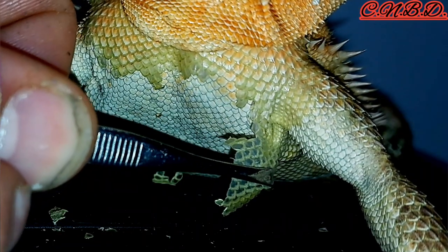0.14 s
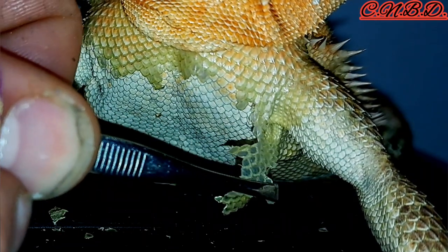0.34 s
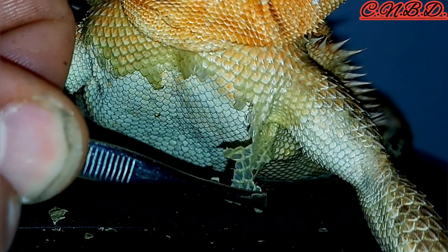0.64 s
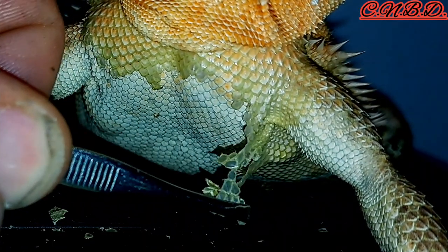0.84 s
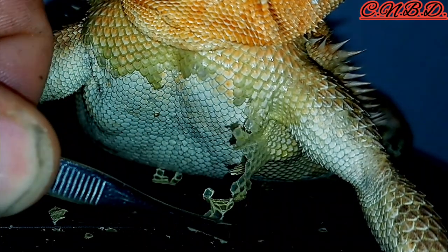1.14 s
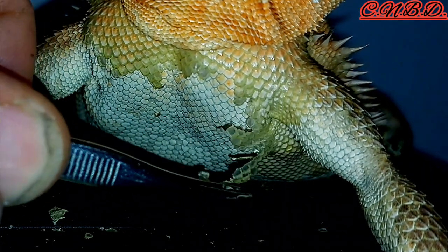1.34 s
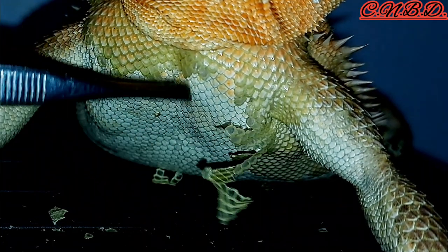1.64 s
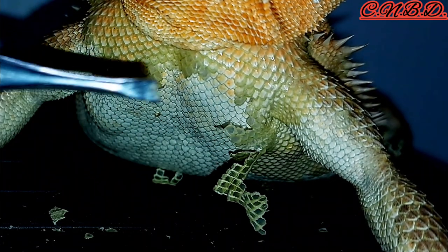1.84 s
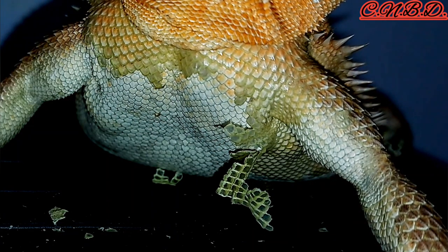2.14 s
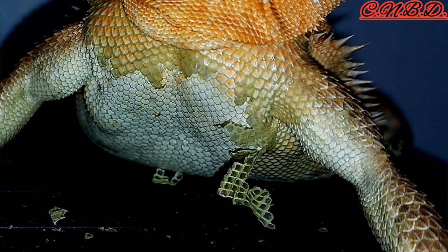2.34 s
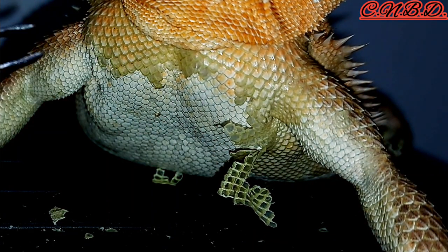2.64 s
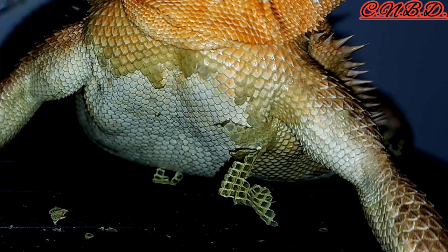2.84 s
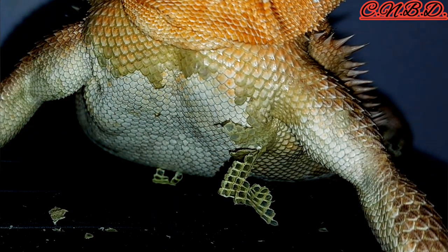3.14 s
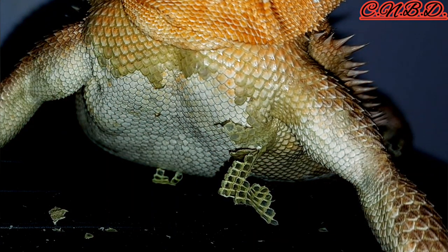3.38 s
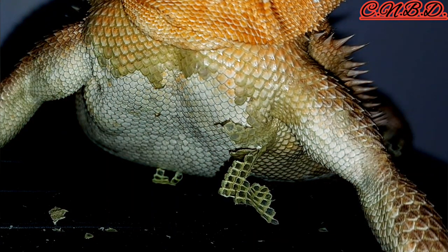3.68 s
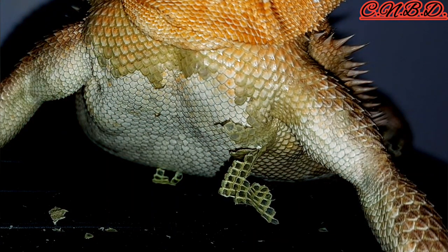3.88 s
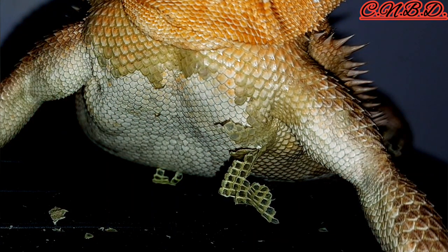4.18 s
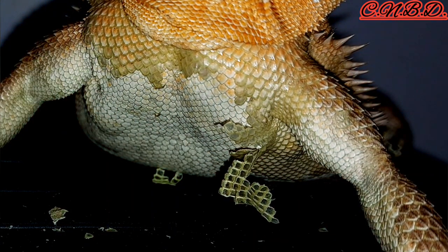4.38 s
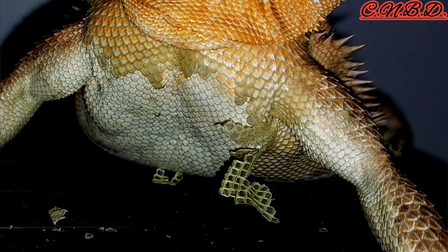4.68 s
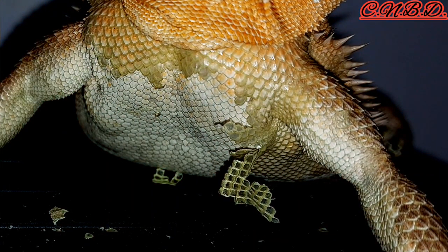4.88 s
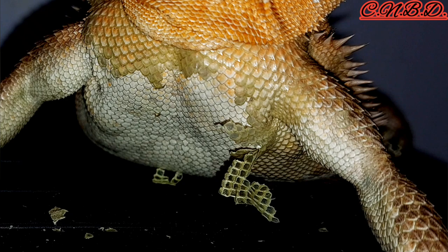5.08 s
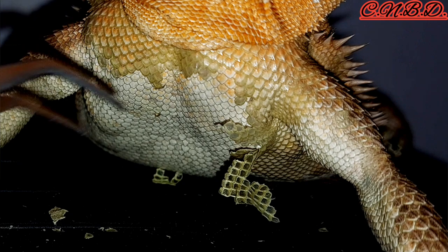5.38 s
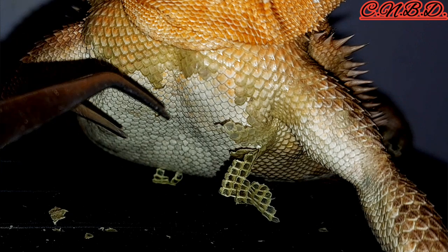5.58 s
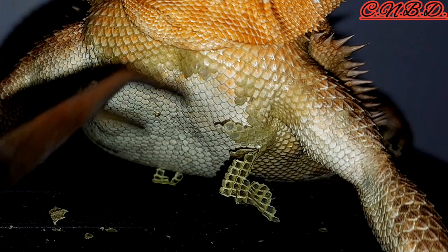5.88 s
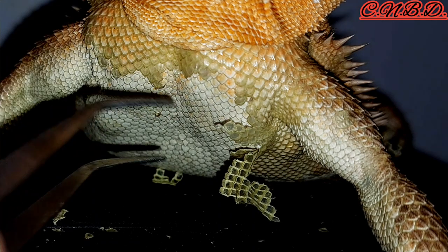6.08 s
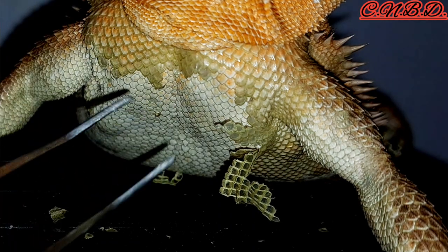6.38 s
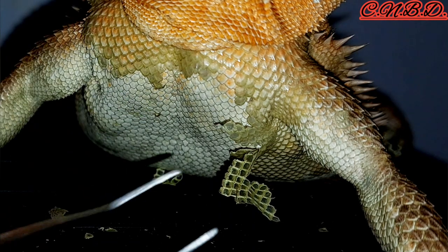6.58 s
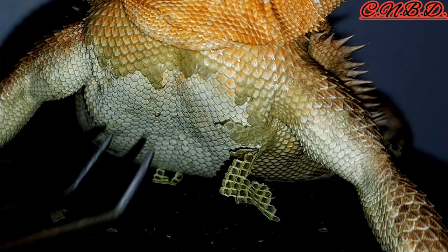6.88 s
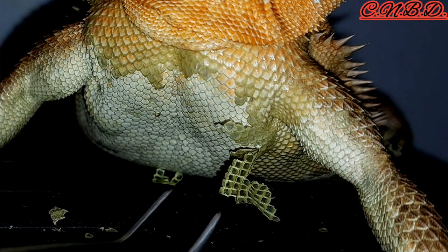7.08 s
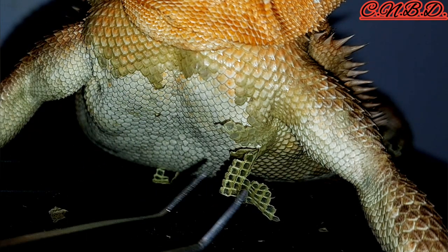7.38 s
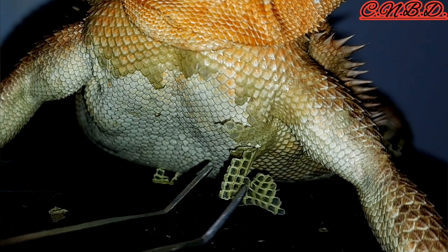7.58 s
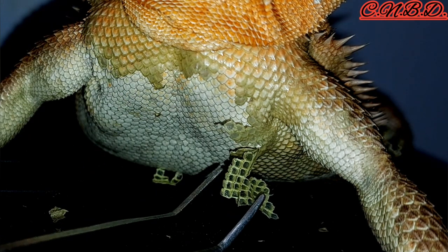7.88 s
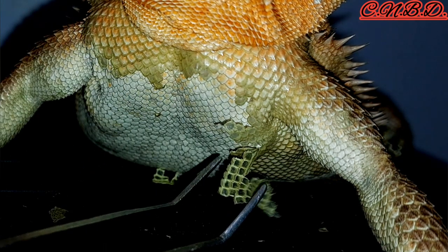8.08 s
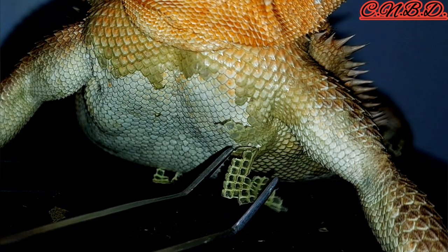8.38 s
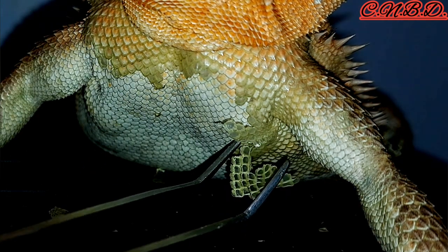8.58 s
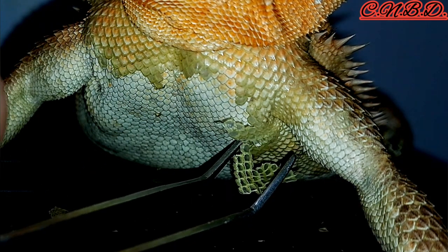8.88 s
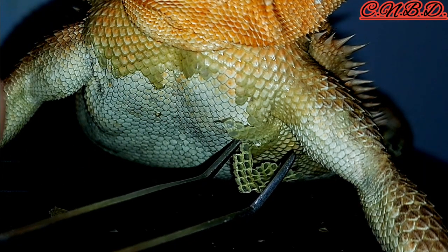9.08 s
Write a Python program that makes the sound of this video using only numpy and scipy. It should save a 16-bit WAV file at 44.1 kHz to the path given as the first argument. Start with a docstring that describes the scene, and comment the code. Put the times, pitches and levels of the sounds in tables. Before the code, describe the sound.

Close, quiet handling of tweezers: tiny snaps of peeling skin, sleeve rustle, low rumble, then sharp knocks on a table and a few fine metallic clicks.

```python
"""Tweezers used, laid down and swapped on a table top, close to two microphones in a quiet room.
Throughout: faint hiss, rumble, humming low table modes, a thin whine, small movements.
0-1 s: dry skin crackles and ticks (noise snaps). 1-5 s: hands and sleeves rustle (grainy noise),
tips scrape skin (resonant noise), light knocks (ringing modes), tools slide (jolting noise).
From 5.8 s: knocks, hardest at 6.1-7.1 s, steel strokes (ringing friction noise); then ticks, rustle."""
import sys
import numpy as np
from scipy import signal
from scipy.fft import rfft, irfft
from scipy.io import wavfile
from scipy.ndimage import uniform_filter1d

SR = 44100
rng = np.random.default_rng(int(sys.argv[2]) if len(sys.argv) > 2 else 0)


def log_audio(samples):
    """Write samples as a 16-bit WAV file to the path given in sys.argv[1]."""
    # one column per channel
    frames = np.atleast_2d(samples).T
    # limit to full scale, then quantise
    limited = np.clip(frames, -1, 1)
    pcm = np.round(limited * 32767).astype(np.int16)
    wavfile.write(sys.argv[1], SR, pcm)


N = 407043  # samples

# Spectra below set relative level only: (frequency [Hz], density [dB per Hz]).
# room tone and microphone noise spectrum: (frequency [Hz], density [dB per Hz])
HISS_SPECTRUM = [(12, -57.5), (20, -10.5), (49, -13), (91, -19), (142, 6), (163, -10), (204, -9.5),
                 (328, -18.5), (388, -25.5), (558, -27.5), (2140, -35.5), (5850, -44.5), (9400, -40),
                 (12400, -38.5), (16000, -40)]
HISS_DB = -62
# left-right correlation of the hiss: (frequency [Hz], correlation [-1..1])
HISS_CORRELATION = [(60, 1), (180, 0.8), (550, 0.27), (1650, -0.2), (4970, -0.55), (15000, -0.51)]
# room decay: (frequency [Hz], t60 [s])
ROOM_DECAY = [(150, 0.47), (400, 0.24), (1000, 0.24), (2800, 0.2), (7500, 0.14)]
EDGE_HZ = 15900
LAG_S = 0.00019  # low sounds reach the left microphone first

# table under arms and house rumble: (time [s], hum [dB], deep sway [dB], creak [dB])
SHAKE_LEVELS = [(0.0, -89, -67, -98), (0.38, -52, -52.5, -73), (0.6, -66.5, -62, -76),
                (1.2, -62.5, -56, -76), (1.45, -79, -62.5, -77.5), (1.9, -65, -59.5, -73),
                (2.11, -41.5, -44.5, -62), (2.41, -64, -61.5, -71.5), (2.57, -53.5, -56, -67.5),
                (2.88, -67.5, -64, -72.5), (3.05, -55, -61, -71), (3.6, -66, -74, -73.5),
                (3.8, -55.5, -60.5, -59), (4.32, -52, -56, -61.5), (4.55, -49, -59, -68.5),
                (5.2, -61, -64.5, -75.5), (5.58, -73, -85, -86.5), (5.78, -56.5, -69, -71),
                (6.3, -43.5, -56, -56.5), (6.53, -56.5, -60, -83), (6.71, -45, -56, -68),
                (7.2, -51, -52.5, -70), (7.54, -70, -74, -64.5), (7.82, -49.5, -59, -69.5),
                (8.11, -59.5, -70.5, -75), (8.57, -47, -54.5, -64), (9.23, -57.5, -68, -76)]
# low tone: (time [s], level [dB])
DRONE_LEVELS = [(0.0, -59), (0.36, -49), (1.26, -59), (1.6, -73), (9.23, -71.5)]
# strongest table mode as arms load the table: (time [s], pitch [Hz])
HUM_PITCH_CURVE = [(0.0, 142.8), (1.9, 145.1), (2.2, 157.8), (6.68, 153), (7.3, 159.4), (8.1, 157.7),
                   (8.5, 152.4), (9.23, 150.8)]
# low bands of the shaken table: (centre [Hz], width [Hz], relative level [dB])
SWAY_BANDS = [(59.5, 15, 1.5), (74.7, 12, 0), (119.4, 27, 0)]
# higher bands of the shaken table: (centre [Hz], width [Hz], relative level [dB])
CREAK_BANDS = [(257.9, 49, 3.5), (341.3, 15, -2.5), (432, 87, -10.5)]
HUM_HZ, HUM_WANDER_HZ = 157.05, 2.543  # band centre near the strongest mode; RMS stray of its tone
WHINE_HZ, WHINE_DB = 340.4, -81

# hand and cloth movements: (start [s], length [s], fine rustle [dB], rub re fine [dB],
# scuff re fine [dB], left-right [dB])
RUSTLE_MOVES = [(0.337, 0.11, -71.5, 4, -0.5, 3), (0.95, 0.13, -69.5, -12, -18, -1),
                (1.2, 0.11, -75.5, -2, -14, 5), (1.46, 0.24, -72.5, -5, -10, 22),
                (1.63, 0.19, -69.5, -9, -20, 19), (1.77, 0.29, -69, 1, -5.5, 8),
                (1.99, 0.088, -72, -7, -18, 12), (2.06, 0.24, -74.5, 5.5, 11.5, 12),
                (2.22, 0.5, -72.5, 1, -1.5, 9), (2.58, 0.18, -70, -4.5, -19, 9),
                (2.7, 0.24, -70, 3.5, -2.5, 16), (2.9, 0.16, -67, -3, -16, 17),
                (2.98, 0.23, -67.5, 3, -0.5, 9), (3.35, 0.3, -64, -1.5, -10, 5.1),
                (3.55, 0.22, -72.5, 1, -14, 4), (3.84, 0.21, -75, 2, -3.5, 10),
                (4.19, 0.11, -61.5, -3, -24, 12), (4.248, .1, -52.5, -5, -30, 4),
                (4.3, 0.11, -67.5, -1.5, -24, 0), (4.42, 0.23, -74.5, -3, -13, 4),
                (4.64, 0.25, -69.5, 0.5, -12, 11), (4.8, 0.12, -70, -13, -16, 7),
                (4.876, 0.13, -70, -8, -16, 10), (4.979, 0.16, -72.5, -12, -21, 11),
                (5.24, 0.17, -76, -9, -19, 11), (5.8, 0.43, -78, -3, -14, 16),
                (6.09, 0.42, -76.5, -9, -14, 22), (6.255, 0.18, -71, 1.5, -15, 6),
                (6.55, 0.24, -69.5, -9, -25, 11), (6.74, .1, -68.5, 3, -11, 10),
                (6.87, 0.23, -72, -7, -19, 10), (7.04, 0.12, -70, -4, -25, 17),
                (7.105, 0.17, -67, -5.5, -11, 7), (7.5, 0.16, -77, -11.5, -12, 13),
                (7.63, .11, -73, -4, -16, 9), (8.57, 0.098, -75, -2.5, -16, 7),
                (8.81, .07, -82.5, 8.5, -3, 10)]
# constant small movements: (fine rustle [dB], rub re fine [dB], scuff re fine [dB], left-right [dB])
CALM_LEVELS = (-78, -7, -6, 3)
# fine rustle spectrum: (frequency [Hz], density [dB per Hz])
FINE_SPECTRUM = [(3530, -15), (6000, -15.5), (8570, -7.5), (10000, -1.5), (12700, 3.5), (15200, -2),
                 (16000, -9)]
# rub spectrum: (frequency [Hz], density [dB per Hz])
RUB_SPECTRUM = [(2500, -22), (4000, -5.5), (6000, -1), (8000, 0), (11000, -15)]
# scuff and scratch spectrum: (frequency [Hz], density [dB per Hz])
COARSE_SPECTRUM = [(700, -23), (1400, -4), (2200, -1), (3800, -5.5), (6000, -13.5)]
SWELL_SHARE = 0.3  # share of a movement spent growing
PEAKEDNESS = 2.07  # larger: a movement is loud for a smaller part of its length

# tip scraping dry skin: (start [s], length [s], level before fades [dB])
SKIN_SCRAPES = [(1.518, 0.11, -70.5), (1.843, 0.18, -76), (7.443, .16, -83)]
# scrape resonances: (centre [Hz], width [Hz], relative level [dB])
SCRAPE_BANDS = [(1640, 610, 0), (3850, 630, -1.5)]
# skin under tension: (start [s], end [s])
SKIN_PULLS = [(0, .32), (.55, .95)]

# things pushed along the table: (start [s], swell [s], length [s], top level [dB],
# deep part relative [dB], scratch relative [dB])
PUSHES = [(2.06, 0.037, 0.2, -55, 19.5, -12), (2.442, 0.041, 0.16, -48.5, -15, -30),
          (4.192, .12, .23, -43, -5, -21)]
# spectrum of the dragged board: (frequency [Hz], density [dB per Hz])
DRAG_SPECTRUM = [(130, -30), (200, 5.5), (480, 6), (700, -2.5), (1000, -11.5), (1500, -30.5), (2200, -38)]
GRIP_DB, LET_GO_DB = -8, -29.5  # start and end of a push re its top, before fades

# steel dragged over steel: (start [s], swell [s], length [s], top level [dB],
# cut of the modes below 9500 Hz [dB])
STEEL_STROKES = [(6.416, 0.072, 0.15, -64.5, 15), (6.728, .03, 0.18, -70, 2)]
# modes of the steel arms: (centre [Hz], width before broadening [Hz], level before the cut [dB])
STEEL_MODES = [(6950, 690, 3), (8000, 250, 3), (10100, 160, -2), (10900, 290, -1), (11630, 260, -2),
               (12230, 310, 2), (13700, 400, 1), (14900, 400, 3)]
STROKE_ENDS_DB = -13  # start and end of a stroke re its top, before fades
FLICKER_DB = 1.5  # RMS; each steel mode comes and goes on its own

# ticks of skin and steel tips: (time [s], peak before panning [dB], pitch [Hz], left-right [dB])
TICK_EVENTS = [(0.0398, -62, 7830, -9), (0.156, -66, 8400, -7.5), (0.17, -53.5, 8100, -15),
               (0.2164, -59.5, 9930, 1.5), (0.3486, -47, 8200, 10), (0.355, -47, 8400, 2.5),
               (0.385, -46, 12000, 18), (0.389, -50, 9320, 0), (0.433, -55, 8250, -14),
               (0.6703, -53, 8400, 7), (0.876, -54.5, 8200, 1.5), (0.9715, -44.5, 8000, 11),
               (0.9887, -46, 12600, 14), (1.2385, -54, 12800, 16), (1.5713, -48.5, 13050, 20),
               (2.918, -51, 12100, 17), (4.2, -53, 10400, 10), (4.266, -50, 10200, 3),
               (4.2877, -42, 12400, 12), (5.246, -58, 5200, -2), (5.2644, -56, 14800, 11),
               (5.813, -56, 12100, 13), (5.9584, -58, 11600, 3), (6.095, -55, 11900, 16),
               (6.1078, -51, 5350, 14), (6.1452, -54, 5110, 1), (6.1764, -52, 12300, 14),
               (6.2614, -34, 7460, 20), (6.5655, -52, 12400, 26), (6.6688, -54.5, 12400, 19),
               (6.7326, -49, 14600, 20), (6.783, -58, 12700, 9.5), (6.87, -58, 13900, 11),
               (6.8872, -50.5, 14100, 19), (6.9014, -57, 12500, 10), (6.932, -54, 13900, 9.5),
               (6.9537, -43, 14200, 19), (7.0439, -59, 10400, 15), (7.079, -57, 12200, 14),
               (7.1122, -46.5, 11600, 22), (7.582, -52.5, 11500, 18), (7.6575, -62, 12300, 0),
               (7.6755, -48.5, 12700, 17), (7.6854, -54, 12200, 10), (8.4598, -55, 15090, 7),
               (8.6141, -54.5, 11700, 11), (8.8279, -57, 11700, 12), (8.8336, -53.5, 5900, 19),
               (8.8434, -61, 12100, 10), (8.934, -65, 6000, 13)]
TICK_T60_S = 0.01

# knocks on the table: (time [s], level [dB], thud, body and crack relative [dB],
# body pitch [Hz], clack pitch [Hz], crack pitch [Hz], left-right [dB])
KNOCK_EVENTS = [(1.125, -64, -3, -4, -14, 205, 974, 2020, 1.5),
                (1.207, -67, 5, 13.5, -5, 237, 900, 2740, 8), (1.92, -57.5, -8, 12.5, 2, 406, 764, 3700, 1),
                (1.954, -58, 10, 10, 1, 215, 1130, 3850, 2),
                (2.064, -40, 10.5, -3, -11, 254, 755, 2000, 0.5),
                (2.104, -44, 20, 6, -14, 202, 750, 2110, 0), (2.445, -49, 2.5, 6, -9, 437, 770, 2030, 5),
                (3.451, -65, 19, 18.5, -28, 248, 931, 4840, 4), (5.794, -67, 13, 20, -1, 237, 925, 2330, 6),
                (6.107, -29.5, -3, 2.5, -3.5, 277, 1090, 3260, 13),
                (6.115, -26, -4, -1.5, -0.5, 223, 1000, 2030, -2.5),
                (6.146, -24.5, -7.5, -1, -10.5, 225, 950, 3200, 0),
                (6.261, -17.5, -38, -1.5, -2.5, 268, 1020, 3700, 1),
                (6.565, -48.5, 7, 23, -17, 312, 960, 3350, 4),
                (6.594, -50.5, 10.5, 17, -20, 253, 751, 2200, 1.5),
                (6.661, -50, 12.5, 4.5, -6.5, 320, 960, 2300, 3.5),
                (6.781, -58, 16, -5, 1.5, 248, 964, 2790, 5),
                (7.112, -12, -18, -5.5, -14.5, 331, 1180, 2530, 2.5),
                (7.28, -50, 3, 8, -11, 328, 979, 2030, 2.5),
                (7.886, -57.5, 16.5, 8.5, -20, 333, 990, 3920, 2)]
# modes of the table top: (frequency [Hz], relative level [dB], t60 [s])
TABLE_MODES = [(149.8, 1, 0.049), (216.7, -1.5, 0.0938), (254.8, -4.5, 0.08), (336, -1.5, 0.054),
               (434.5, -4.5, 0.07), (513, -8.5, 0.18), (615.7, -13, 0.19), (667.4, -9.5, 0.17),
               (750, -7, 0.027), (831, -8.5, 0.041), (965, -4, 0.038), (1042, -5, 0.0386), (1073, -4, 0.03),
               (1281, -10, 0.049), (1427, -19.5, 0.066), (1547, -18, 0.045), (1800, -12.5, 0.078)]
THUD_BELOW_HZ, CLACK_ABOVE_HZ = 190, 720  # body modes lie between
FAVOUR_DB_PER_OCTAVE = 14  # loss of a mode away from the favoured pitch


def amp(db):
    """Decibels to gain."""
    return 10 ** (np.asarray(db) / 20)


def evened(x):
    """Scales to unit RMS."""
    return x / np.sqrt(np.mean(x ** 2) + 1e-20)


def read(points, hz):
    """Interpolates a table on a log-frequency axis."""
    f, value = np.transpose(points)
    return np.interp(np.log(hz + 1), np.log(f + 1), value)


def curves(rows):
    """Interpolates the columns of a control table at every sample."""
    s, *columns = np.transpose(rows)
    return [np.interp(np.arange(N) / SR, s, c) for c in columns]


def panned(x, pan_db):
    """Places a sound left or right by level."""
    return np.array([x * amp(pan_db / 2), x * amp(-pan_db / 2)])


def add(mix, s, sound):
    """Mixes a sound in at time s, in place."""
    part = mix[:, round(s * SR):][:, :sound.shape[1]]
    part += sound[:, :part.shape[1]]


def shaped(x, spectrum):
    """Filters a sound by a spectrum, to unit RMS."""
    hz = np.fft.rfftfreq(x.shape[-1], 1 / SR)
    return evened(irfft(rfft(x) * amp(read(spectrum, hz)), x.shape[-1]))


def humming(bands, size):
    """Noise ringing in a few resonances, at unit RMS."""
    hz = np.fft.rfftfreq(size, 1 / SR)
    gain = sum(amp(db) / np.sqrt(w) / (1 + 2j * (hz - f) / w) ** 2 for f, w, db in bands)
    return evened(irfft(rfft(rng.standard_normal(size)) * gain, size))


def wavering(hz, wander_hz):
    """A steady tone at unit RMS whose pitch strays slowly."""
    drift = uniform_filter1d(rng.standard_normal(N), 2500)
    stray = evened(uniform_filter1d(drift, 2500))
    cycles = np.cumsum(hz + wander_hz * stray) / SR + rng.random()
    return np.sqrt(2) * np.sin(2 * np.pi * cycles)


def correlated(a, b, correlation):
    """Makes a stereo pair of a and a mix of a and b."""
    return np.array([a, correlation * a + np.sqrt(1 - correlation ** 2) * b])


def hiss():
    """Room tone and microphone noise, most alike between channels in the bass."""
    a, b = rfft(rng.standard_normal((2, N)))
    correlation = np.clip(read(HISS_CORRELATION, np.fft.rfftfreq(N, 1 / SR)), -1, 1)
    return amp(HISS_DB) * shaped(irfft(correlated(a, b, correlation), N), HISS_SPECTRUM)


def room(x):
    """Reverberation: sparse taps of random sign, each band dying at its own speed."""
    taps = np.zeros((2, SR // 2))
    starts = np.arange(240, SR // 2 - 20, 20)
    at = starts + rng.integers(0, 20, (2, len(starts)))
    np.put_along_axis(taps, at, rng.choice([-1., 1.], at.shape), 1)
    hz, t, z = signal.stft(taps, SR, nperseg=256)
    decay = amp(-60 * t / read(ROOM_DECAY, hz)[:, None])
    tail = signal.istft(z * decay, SR, nperseg=256)[1]
    tail = tail + .5 * tail[::-1]  # the channels share part of the room sound
    return signal.fftconvolve(x, tail / np.linalg.norm(tail[0]), axes=1)[:, :N]


def shaking():
    """Rumble and arms excite the table: straying tones and resonant noise, late on the right."""
    hum_db, sway_db, creak_db = curves(SHAKE_LEVELS)
    near = amp(hum_db) * wavering(curves(HUM_PITCH_CURVE)[0], HUM_WANDER_HZ)
    near += amp(curves(DRONE_LEVELS)[0]) * wavering(SWAY_BANDS[0][0], 1.52)
    near += amp(WHINE_DB) * wavering(WHINE_HZ, 1.5)
    near += amp(sway_db) * humming(SWAY_BANDS, N)
    near += amp(creak_db) * humming(CREAK_BANDS, N)

    # opposite in the two channels
    apart = 0.09 * amp(hum_db) * humming([(HUM_HZ, 12, 0)], N)
    apart += 0.22 * amp(sway_db) * humming(SWAY_BANDS, N)
    apart += .5 * amp(creak_db) * humming(CREAK_BANDS, N)

    late = np.interp(np.arange(N) - LAG_S * SR, np.arange(N), near)
    return np.array([amp(-0.7) * near + apart, amp(-2.13) * late - apart])


def layers(db, rub_db, scuff_db, pan_db):
    """Power of the fine, rub and scuff layers, left and right; deeper layers pan less."""
    fine = panned(amp(db), pan_db)
    rub = panned(amp(db + rub_db), 0.21 * pan_db)
    scuff = panned(amp(db + scuff_db), 0)
    return np.array([fine, rub, scuff]) ** 2


def rustle():
    """Small fibre slips: noise roughened by random grains; each movement swells and fades."""
    power = layers(*CALM_LEVELS)[:, :, None] * np.ones(N)
    for s, length, *row in RUSTLE_MOVES:
        progress = np.arange(0, length, 1 / SR) / length
        phase = np.interp(progress, [0, SWELL_SHARE, 1], [0, .5, 1])
        swell = abs(np.sin(np.pi * phase)) ** PEAKEDNESS
        for layer, gain in zip(power, layers(*row)):
            add(layer, s, gain[:, None] * swell)

    sparse = rng.exponential(1, N) * (rng.random(N) < 300 / SR)  # about 300 slips per second
    grain = evened(1 + 0.16 * evened(uniform_filter1d(sparse, 60)))
    sound = np.zeros((2, N))
    spectra = [(FINE_SPECTRUM, 0.043), (RUB_SPECTRUM, 0.11), (COARSE_SPECTRUM, 0.26)]
    for gain, (spectrum, correlation) in zip(np.sqrt(power), spectra):
        a, b = rng.standard_normal((2, N))
        sound += gain * shaped(correlated(a, b, correlation) * grain, spectrum)
    return sound


def scrapes():
    """A tip on dry skin: a short swell of noise in two broad resonances."""
    out = np.zeros((2, N))
    for s, length, db in SKIN_SCRAPES:
        size = round(length * SR)
        noise = np.array([humming(SCRAPE_BANDS, size), humming(SCRAPE_BANDS, size)])
        add(out, s, amp(db) * noise * np.hanning(size))
    return out


def crackle():
    """Pulled skin: tiny scales let go at random, each a short decaying tone."""
    t = np.arange(N) / SR
    pulling = sum((t > start) & (t < end) for start, end in SKIN_PULLS)
    sizes = rng.exponential(1, N) * (rng.random(N) < 28 / SR) * pulling  # about 28 per second
    u = np.arange(200) / SR
    snap = np.sin(2 * np.pi * 8100 * u) * amp(-60 * u / 0.0034)
    return panned(amp(-68) * signal.oaconvolve(sizes, snap)[:N], 1.5)


def slides():
    """Stick and slip: uneven jolts shake the board, and the surfaces scratch."""
    out = np.zeros((2, N))
    for s, swell, length, top_db, deep_db, scratch_db in PUSHES:
        t = np.arange(0, length, 1 / SR)
        db = top_db + np.interp(t, [0, swell, length], [GRIP_DB, 0, LET_GO_DB])
        noise = rng.standard_normal((2, len(t)))
        slips = rng.exponential(1, len(t)) * (rng.random(len(t)) < 400 / SR)  # about 400 per second
        jolts = noise[0] * (1.06 + 8 * slips)
        board = shaped(jolts + 1.7 * noise, DRAG_SPECTRUM)
        scratch = amp(scratch_db) * shaped(noise, COARSE_SPECTRUM)
        deep = amp(deep_db) * humming([(62, 25, 0), (HUM_HZ, 30, 0)], len(t))
        fade = np.minimum(1, np.minimum(t / 0.011, (length - t) / 0.03))
        add(out, s, amp(db) * (board + scratch + deep) * fade)
    return out


def strokes():
    """Friction noise rings the high modes of the steel arms."""
    out = np.zeros((2, N))
    for s, swell, length, top_db, cut_db in STEEL_STROKES:
        t = np.arange(0, length, 1 / SR)
        ring = np.zeros(len(t))
        for hz, width_hz, mode_db in STEEL_MODES:
            stray = evened(uniform_filter1d(rng.standard_normal(len(t)), 700))
            gain = amp(mode_db - cut_db * (hz < 9500)) * amp(FLICKER_DB * stray)
            ring += gain * humming([(hz, 1.6 * width_hz, 0)], len(t))
        skips = uniform_filter1d(rng.standard_normal(len(t)), 160) ** 2
        grit = evened(2.4 + 90 * skips)  # the arms catch and skip
        db = top_db + np.interp(t, [0, swell, length], [STROKE_ENDS_DB, 0, STROKE_ENDS_DB])
        fade = signal.windows.tukey(len(t), .3)
        add(out, s, panned(amp(db) * grit * evened(ring) * fade, 23))
    return out


def ticks():
    """Each tick is a short snap of noise around its pitch."""
    out, t = np.zeros((2, N)), np.arange(4000) / SR
    envelope = amp(-60 * t / TICK_T60_S) * (1 - np.exp(-t / 0.00073))
    for s, db, hz, pan_db in TICK_EVENTS:
        colour = [(.4 * hz, -34), (0.91 * hz, -13), (hz, 0), (1.01 * hz, -11), (1.1 * hz, -15)]
        snap = shaped(rng.standard_normal(len(t)), colour) * envelope
        add(out, s, panned(amp(db) * snap / abs(snap).max(), pan_db))
    return out


def knocks():
    """A blow rings the table modes near the pitches the struck spot favours, with a noise crack."""
    out, t = np.zeros((2, N)), np.arange(SR // 3) / SR
    hz, mode_db, t60_s = np.transpose(TABLE_MODES)[:, :, None]
    sign = (-1.) ** np.arange(len(TABLE_MODES))[:, None]  # neighbouring modes move against each other
    rings = sign * amp(mode_db - 60 * t / t60_s) * np.sin(2 * np.pi * hz * t)
    crack_tail = 0.15 * amp(-60 * t / 0.34 - 60 * (t / .2) ** 4)
    crack_envelope = amp(-60 * t / 0.028) + crack_tail
    for s, db, thud_db, body_db, crack_db, body_hz, clack_hz, crack_hz, pan_db in KNOCK_EVENTS:
        body_modes_db = body_db - FAVOUR_DB_PER_OCTAVE * abs(np.log2(hz / body_hz))
        clack_modes_db = -FAVOUR_DB_PER_OCTAVE * abs(np.log2(hz / clack_hz))
        regions = [hz < THUD_BELOW_HZ, hz > CLACK_ABOVE_HZ]
        share_db = np.select(regions, [thud_db, clack_modes_db], body_modes_db)
        ring = (amp(share_db) * rings).sum(0)
        late = np.interp(t - LAG_S, t, ring, left=0)

        a, b = rng.standard_normal((2, len(t)))
        colour = [(500, -24), (0.36 * crack_hz, -5), (crack_hz, 0), (1.4 * crack_hz, -10), (15000, -28)]
        crack = shaped(np.array([a, 0.17 * a + b]), colour) * crack_envelope
        both = np.array([ring, late]) + amp(crack_db) * crack / abs(crack).max()
        add(out, s, both * panned(amp(db), pan_db)[:, None])
    return out


def scene():
    """Knocks and ticks ring in the room; the rest gets no reverberation."""
    background = hiss() + shaking()
    handling = rustle() + scrapes() + crackle() + slides() + strokes()
    snaps, blows = ticks(), knocks()
    reverb = room(amp(-8.0) * blows + amp(-9.0) * snaps)
    return background + handling + snaps + blows + reverb


def record(dry):
    """The band limit of the recorder: a linear-phase low-pass."""
    lowpass = signal.firwin(511, EDGE_HZ, window=("kaiser", 9), fs=SR)
    return signal.oaconvolve(dry, lowpass[None], "same")


dry = scene()
out = record(dry)
log_audio(out)
```